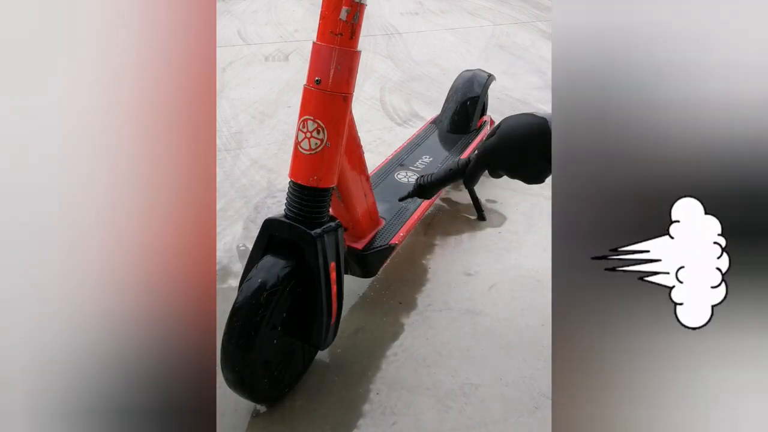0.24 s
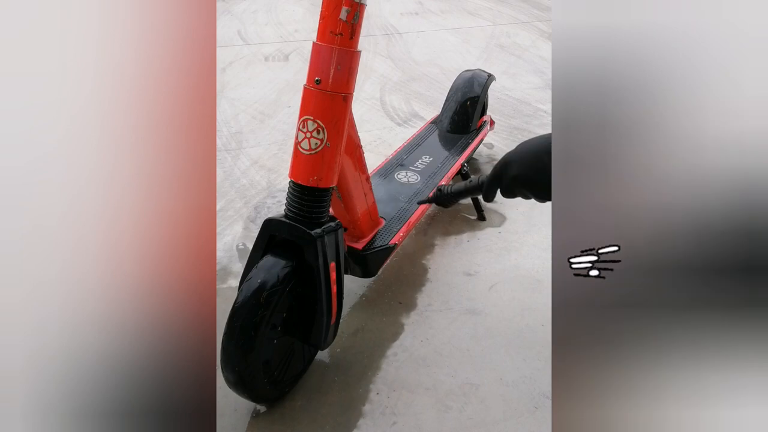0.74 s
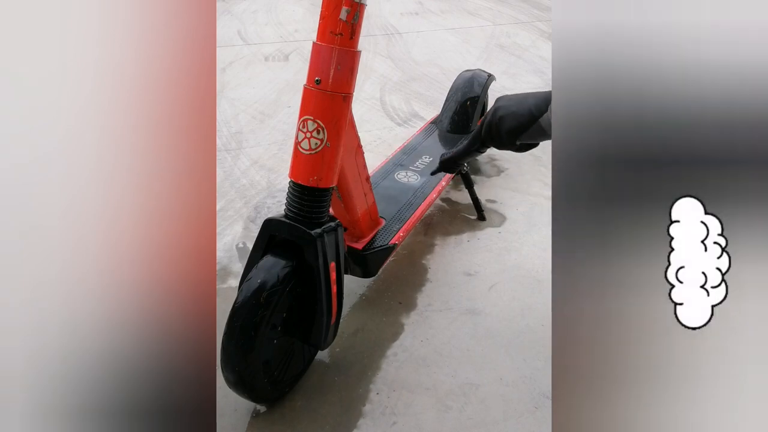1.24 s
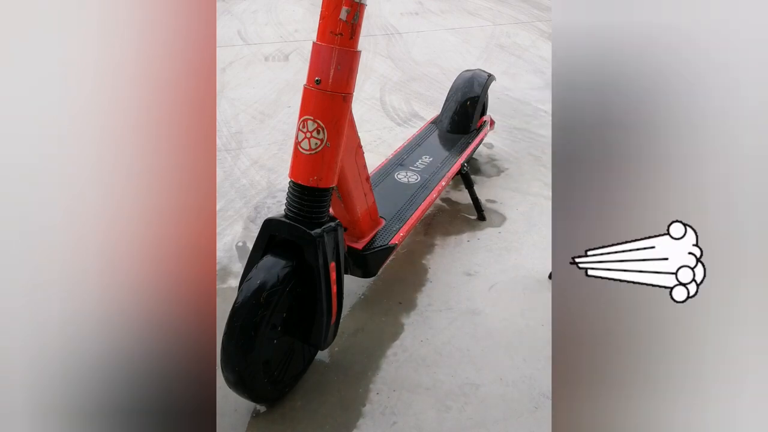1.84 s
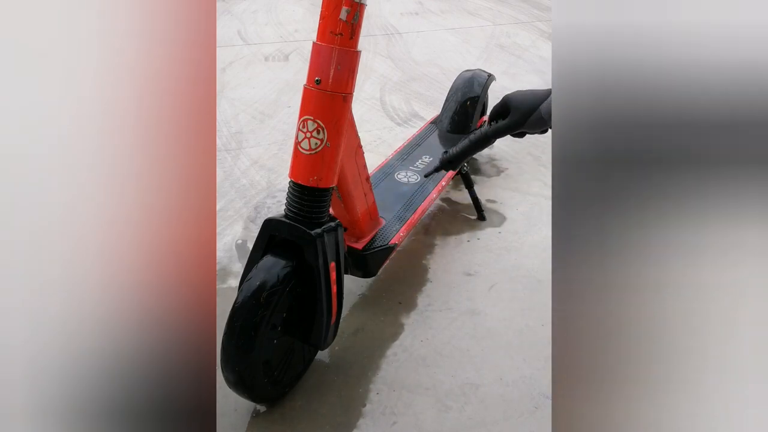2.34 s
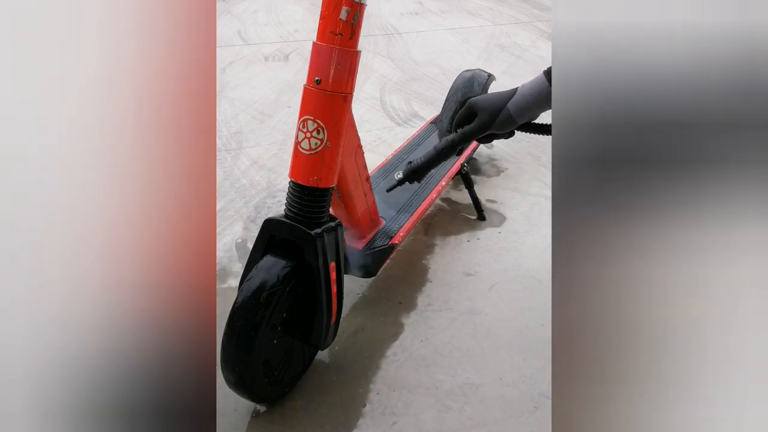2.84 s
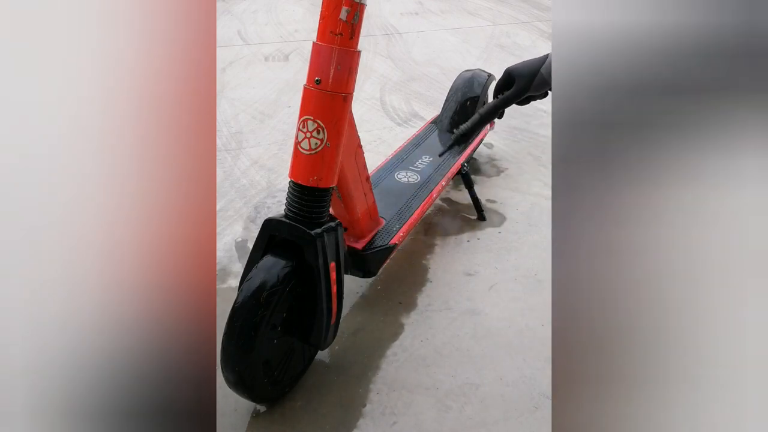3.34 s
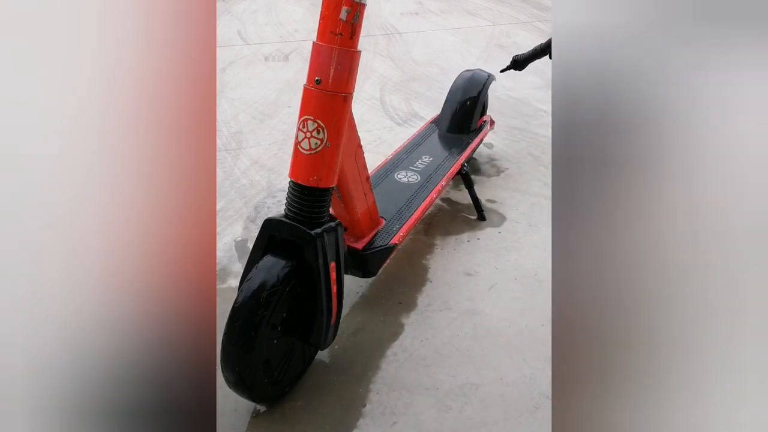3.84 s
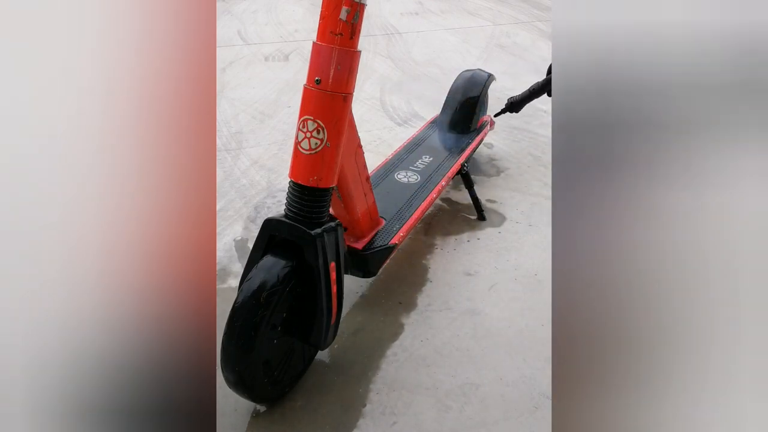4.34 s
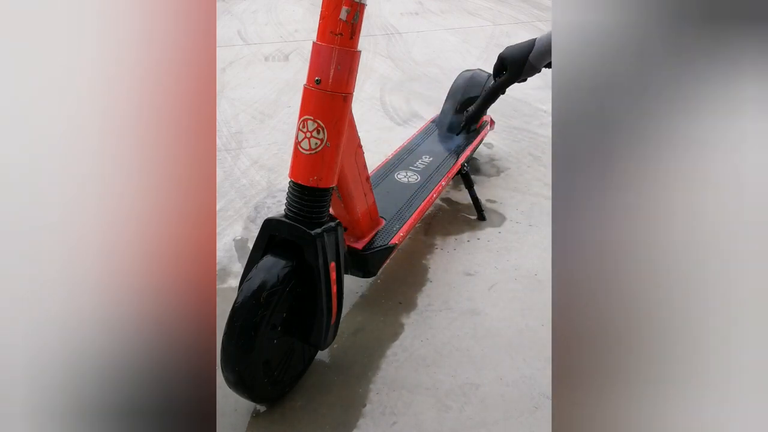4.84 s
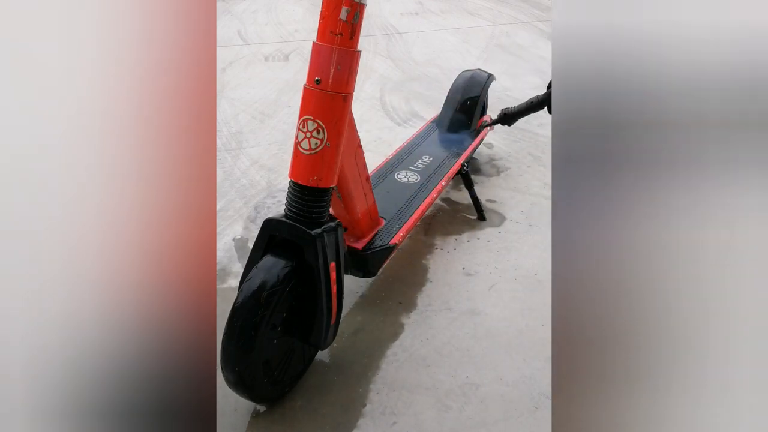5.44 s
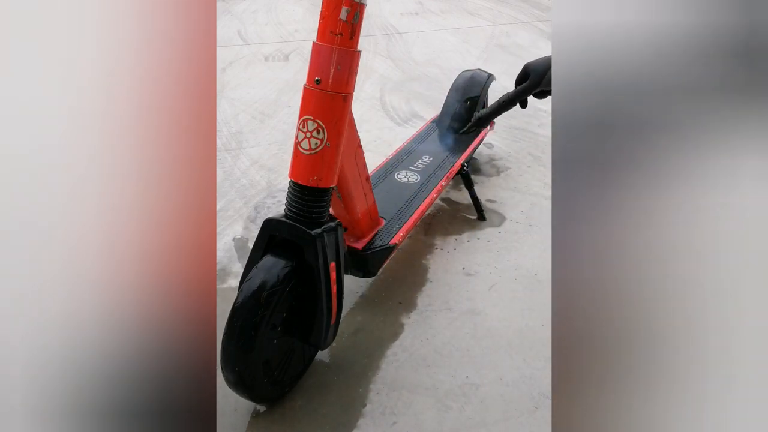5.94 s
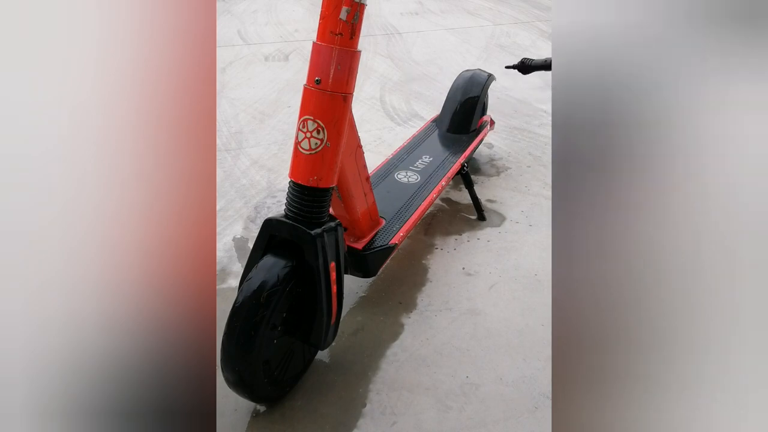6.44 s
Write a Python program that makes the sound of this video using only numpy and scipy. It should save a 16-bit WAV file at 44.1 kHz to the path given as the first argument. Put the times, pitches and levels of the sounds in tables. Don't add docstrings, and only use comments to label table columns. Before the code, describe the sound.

A steam cleaner wand hisses close by on a scooter over a concrete floor. After about a second and a half the trigger is released: low thumps, a tiny squeak and a hard valve click in near silence. The jet bursts back, flutters over ribs, then sputters, gurgles and toots around the rear wheel. Close stereo microphone, mostly dry, spray leaning left.

```python
import sys
import numpy as np
from scipy import signal
from scipy.fft import rfft, irfft, next_fast_len
from scipy.io import wavfile

SR = 44100
rng = np.random.default_rng(int(sys.argv[2]) if len(sys.argv) > 2 else 0)


def attenuation_scalar(level_db):
    decades = np.asarray(level_db, float) / 20
    return 10 ** decades


def output_pcm(signal):
    pcm = np.clip(np.atleast_2d(signal).T, -1, 1) * 32767
    wavfile.write(sys.argv[1], SR, np.round(pcm).astype(np.int16))


N = 295911
STEP = 40
HISS_HUMP = 7500, 0.72
SPLASH_HZ, SPIT_OCTAVES = 4000, 0.3


def at_hz(points, hz):
    table_hz, values = np.transpose(points)
    return np.interp(np.log(hz), np.log(table_hz), values)


def at_steps(rows):
    s, *columns = np.transpose(rows)
    steps_s = np.arange(N // STEP + 2) * STEP / SR
    return np.array([np.interp(steps_s, s, c) for c in columns])


def smooth(steps):
    return np.interp(np.arange(N) / STEP, np.arange(len(steps)), steps)


def drift(rate_hz):
    r = np.exp(-2 * np.pi * STEP * rate_hz / SR)
    slow = signal.lfilter([1], [1, -2 * r, r * r], rng.standard_normal(N // STEP + 2002))[2000:]
    return slow / slow.std()


def bell(bands_hz, centre_hz, octaves):
    return np.exp(-.5 * (np.log2(bands_hz / centre_hz) / octaves) ** 2)


def plateau(s, start_s, end_s):
    edge_s = 0.26 * (end_s - start_s)
    return np.clip(np.minimum(s - start_s, end_s - s) / edge_s, 0, 1) ** 2


def strike(force, modes, turn=1):
    out = 0
    for k, (hz, level_db, t60_s) in enumerate(modes):
        r, w = attenuation_scalar(-60 / (t60_s * SR)), 2 * np.pi * hz / SR
        gain = turn ** k * attenuation_scalar(level_db) * np.sin(w)
        out = out + signal.lfilter([0, gain], [1, -2 * r * np.cos(w), r * r], force + 1e-18)
    return out


def clicks_at(events):
    out = np.zeros(N)
    for s, level_db in events:
        out[round(s * SR)] = -attenuation_scalar(level_db)
    return out


def room_air(s):
    floor_db = [-68, -64.5, -63.5, -65, -85, -99]
    start_db, fade_db_per_s = np.array([-55.5, -53]), 33
    power = np.outer(attenuation_scalar(2 * np.array(floor_db)), np.ones(len(s)))
    power[:2] += attenuation_scalar(2 * (start_db[:, None] - fade_db_per_s * s))
    return power


def thumps():
    # start [s], level [dB], contact [ms]
    knocks = [(1.707, -26.5, 11.7), (1.73, -35, 20), (1.751, -29.5, 12.2), (1.934, -45, 15.5),
              (1.972, -55, 17), (2.013, -52, 14), (2.456, -52, 21), (2.485, -44.5, 16)]
    # mode [Hz], level [dB], t60 [s]
    thump_modes = [(55.5, 0, 0.076), (35.1, -7, 0.4), (78, -10, 0.2), (134, -6, 0.12), (210, -14, 0.05),
                   (310, -28, .04)]
    push = np.zeros(N)
    for s, level_db, contact_ms in knocks:
        start, count = round(s * SR), int(contact_ms * SR / 1000)
        press_release = np.sin(2 * np.pi * np.arange(count) / count) * np.pi / count
        push[start:start + count] -= attenuation_scalar(level_db) * press_release
    return strike(push, thump_modes)


def leak():
    # time [s], level [dB], pitch [Hz]
    squeak = [(1.748, -71, 4100), (1.757, -47, 4000), (1.766, -48, 3880), (1.774, -53, 3600),
              (1.79, -52, 3450), (1.796, -75, 3400)]
    level_db, hz = at_steps(squeak)
    level = smooth(attenuation_scalar(level_db + 4.0 * drift(120)) * (level_db > -69))
    wavering_hz = smooth(hz * (1 + .03 * drift(200)))
    return level * np.sin(2 * np.pi * np.cumsum(wavering_hz) / SR)


def trigger():
    # time [s], level [dB]
    valve = [
        (1.7952, -35),
        (1.7966, -22.5),
        (1.7982, -26.5),
        (1.803, -42),
    ]
    # valve mode [Hz], level [dB], t60 [s]
    valve_modes = [(556, -10.5, 0.019), (825, -21, 0.039), (1250, -9, 0.013), (1690, -18, 0.05),
                   (2200, -24, .018), (2680, 1.5, 0.013), (3560, -3, 0.0081), (4180, -1.5, 0.011),
                   (5150, -13, 0.02), (6700, -20, 0.008), (9500, -22, .005)]
    # time [s], level [dB]
    knock = [
        (1.848, -36),
    ]
    # lever mode [Hz], level [dB], t60 [s]
    knock_modes = [(840, 2, 0.038), (1770, -2.5, 0.015), (3500, -5, 0.01), (7440, -7, 0.006)]
    # time [s], level [dB]
    slap = [
        (1.748, -31),
        (1.759, -39.5),
    ]
    # hose mode [Hz], level [dB], t60 [s]
    slap_modes = [(216, -3, 0.069), (1020, -29, .04)]
    blows = [(valve, valve_modes), (knock, knock_modes), (slap, slap_modes)]
    ringing = sum(strike(clicks_at(events), modes, -1.012) for events, modes in blows)
    return signal.lfilter(*signal.butter(2, 9000, fs=SR), ringing)


def ticks():
    # start [s], level [dB], t60 [ms]
    cracks = [(1.7505, -52, 30), (1.7958, -34, 8), (1.798, -36, 10), (1.8485, -50, 25), (1.7165, -58, 20)]
    out, t = np.zeros(N), np.arange(SR // 10) / SR
    for s, level_db, t60_ms in cracks:
        start = round(s * SR)
        out[start:start + len(t)] += attenuation_scalar(level_db - 60000 * t / t60_ms) * rng.standard_normal(len(t))
    band = signal.butter(2, [1800, 8000], "band", fs=SR, output="sos")
    return signal.sosfilt(band, out + 1e-18)


def toots():
    # centre [s], length [ms], level [dB], pitch [Hz], glide [share of pitch]
    notes_blown = [(1.53, 45, -53, 858, 0.017), (1.92, 14, -33, 7600, -0.047), (2.185, 18, -48, 630, 0),
                   (2.299, 10, -45, 1300, 0.39), (3.47, 64, -63, 750, 0), (3.515, 35, -52, 780, 0.036),
                   (3.548, 23.5, -47, 756, -0.029), (3.573, 30, -44, 771, 0.032), (3.672, 41, -49, 770, 0),
                   (4.012, 14, -49, 750, 0.048), (4.033, 11, -40, 3290, 0), (4.205, 20, -40, 1760, -0.023),
                   (4.215, 20, -41.5, 800, -0.034), (4.245, 22, -41, 781, 0.034),
                   (4.327, 19, -38.5, 853, 0.031), (4.362, 16, -43, 905, 0), (4.41, 30, -43, 1750, 0),
                   (4.435, 16, -50, 820, 0), (4.57, 18, -41.5, 960, -0.022), (4.9624, 4, -29, 3300, 0),
                   (4.9665, 5, -30, 3400, 0), (4.955, 20, -47, 1100, 0), (5.042, 24, -48, 778, -0.013),
                   (5.062, 14, -34, 3300, 0), (5.642, 22, -31, 3950, -0.041), (5.683, 16, -30, 3900, .3),
                   (5.695, 14, -34.5, 3150, .1), (5.687, 20, -40, 9300, 0), (6.465, 23, -43, 794, -0.013),
                   (6.471, 8.5, -33.5, 1550, 0), (6.482, 20.5, -41, 1600, 0.08), (6.545, 23, -44, 3200, 0),
                   (6.548, 18, -42.5, 1550, 0.014)]
    out = np.zeros((2, N))
    waver, flicker = smooth(.04 * drift(164)), smooth(attenuation_scalar(3.0 * drift(120)))
    for s, length_ms, level_db, hz, glide in notes_blown:
        count = int(1.5 * length_ms * SR / 1000)
        start = round(s * SR) - count // 2
        span = slice(start, start + count)
        gliding_hz = hz * (1 + glide * np.linspace(-.5, .5, count) + waver[span])
        phase = 2 * np.pi * np.cumsum(gliding_hz) / SR
        turn = rng.uniform(-1.5, 1.5, (2, 1))
        level = attenuation_scalar(level_db + 2) * np.minimum(1.6 * np.hanning(count), 1) * flicker[span]
        out[:, span] += level * np.sin(phase + turn / 2)
    return out


def ribs():
    # first [s], last [s], ribs [count], level [dB], change along the run [dB]
    runs = [(2.344, 2.42, 3, -41, 3), (2.462, 2.643, 5, -34.5, -4.5), (2.833, 2.92, 3, -45, 0),
            (3.269, 3.41, 4, -39.5, 1.5)]
    out = []
    for first_s, last_s, count, level_db, change_db in runs:
        for k in np.linspace(0, 1, round(count)):
            s, db = first_s + (last_s - first_s) * k, level_db + change_db * k
            out.append((s, 30, [(db, SPLASH_HZ, 0.49), (db - 7.5, *HISS_HUMP)]))
    return out


def flares():
    # time [s], length [ms], level [dB]
    slips = [(.064, 6.6, -49), (.49, 3.8, -43), (.512, 20, -43), (.532, 18, -38), (.578, 24, -44),
             (.18, 33, -43), (.725, 50, -35.5), (0.787, 21, -35.5), (1.602, 30, -38), (1.716, 10, -58),
             (1.762, 24, -57.5), (2.23, 30, -39.5), (2.302, 18, -42), (6.15, 24, -38), (6.475, 20, -47),
             (1.854, 17, -56), (1.92, 8.7, -34), (1.974, 63, -36), (2.064, 7.8, -53), (2.139, 32, -43),
             (2.27, 22, -37.5), (2.718, 39, -44), (2.877, 20, -37), (2.999, 15, -39), (3.573, 31, -43),
             (3.623, 24, -43), (3.672, 73, -40), (3.76, 29, -42), (3.968, 18, -38), (3.998, 15, -41.5),
             (4.033, 20, -42.5), (4.312, 39, -38), (4.434, 21, -37.5), (4.618, 64, -31.5), (4.663, 13, -39),
             (5.404, 34, -41), (5.43, 11, -42), (5.81, 76, -41), (6.589, 30, -38.5)]
    return [(s, ms, [(db, *HISS_HUMP), (db - 12.5, SPLASH_HZ, SPIT_OCTAVES)]) for s, ms, db in slips]


def spits():
    # time [s], length [ms], level [dB], pitch [Hz]
    hits = [(.322, 17, -43, 4000), (.49, 8, -46, 3400), (.766, 19, -44.5, 1920), (1.036, 49, -46, 2850),
            (1.108, 39, -43.5, 3520), (1.233, 27, -42.5, 2390), (1.529, 17, -48, 2800),
            (1.858, 19, -56, 3420), (2.878, 29, -40, 3240), (2.999, 15, -50, 3260), (3.672, 72, -55, 3400),
            (3.884, 14, -45, 1900), (4.034, 11, -50, 3250), (4.618, 22, -41, 3400), (6.471, 7, -46, 3000),
            (6.48, 21, -43, 2900), (4.974, 8, -33, 6000), (5.062, 19, -31.5, 3280), (5.094, 28, -36, 3100),
            (5.14, 36, -46, 2980), (4.23, 32, -39, 3000), (5.605, 45, -42.5, 3000), (6.3, 81, -48.5, 2980),
            (4.312, 24, -42, 3540), (4.435, 17, -36, 3000), (4.567, 57, -33.5, 3060),
            (4.968, 14, -35, 3274), (5.072, 20, -36, 4200), (5.125, 65, -54, 2140), (5.521, 19, -42, 2420),
            (5.568, 19, -36, 2900), (5.643, 22, -34, 3600), (5.687, 26, -31.5, 3750),
            (1.776, 38, -56, 3300), (6.24, 16, -37, 3020), (1.41, 31, -48.5, 3660), (6.162, 36, -37, 2780),
            (6.549, 44, -40, 3640)]
    return [(s, ms, [(db, hz, SPIT_OCTAVES), (db - 6, *HISS_HUMP)]) for s, ms, db, hz in hits]


def gurgles():
    # time [s], length [ms], level
    # [dB], pitch [Hz]
    broad_puffs = [(.6, 110, -52.5, 450), (.57, 38, -50.5, 840), (.67, 86, -51, 650), (.085, 68, -51, 480),
                   (.07, 19, -49.5, 1200), (.3, 110, -57, 1590), (4.076, 13, -44, 1650),
                   (4.11, 70, -47.5, 1780), (4.06, 16, -49, 500), (4.175, 16, -48.5, 1290),
                   (4.48, 68, -41.5, 1000), (4.53, 22, -41, 790), (5.05, 38, -58, 780), (5.432, 11, -48, 780),
                   (5.52, 22, -44, 1000), (6.21, 30, -46, 1150), (6.465, 17, -48, 800), (6.645, 85, -63, 1190),
                   (1.53, 38, -54.5, 820), (2.107, 17, -49, 663), (2.184, 17, -47.5, 676),
                   (2.302, 15, -41.5, 1250), (2.3, 19, -46, 750), (2.999, 18, -42, 1540),
                   (3.227, 11, -43.5, 1820), (3.265, 75, -54.5, 190), (3.48, 40, -64, 745),
                   (3.577, 39, -43, 800), (3.673, 25, -45.5, 760), (4.016, 12, -42.5, 700),
                   (4.2, 30, -50, 1720), (4.235, 40, -41, 810), (4.3, 23, -43, 824), (4.361, 16, -37.5, 885),
                   (4.434, 16, -38.5, 795), (4.41, 28, -37, 1650), (4.665, 17, -42, 780),
                   (4.691, 25, -41.5, 780), (4.802, 17, -50, 305), (4.848, 23, -44.5, 500),
                   (5.278, 8.7, -42, 338), (5.291, 24, -42.5, 382), (5.405, 12, -39, 1150),
                   (4.57, 44, -42, 970), (6.167, 51, -44, 790), (6.251, 35, -44, 1180), (6.32, 44, -51, 1450),
                   (6.476, 20, -38, 1530), (6.55, 64, -46, 1510),
                   (1.78, 32, -52, 800), (5.285, 43, -45.5, 650), (5.28, 47, -45, 250), (4.678, 45, -49, 800),
             (4.735, 27, -51, 590), (4.11, 89, -61.5, 130), (3.3, 90, -60.5, 100), (5.7, 76, -58.5, 260),
             (4.75, 260, -47, 9400), (5.8, 220, -43, 8800), (4.2, 170, -54, 9300), (5.685, 20, -37, 4500),
             (5.643, 25, -38, 4300), (2.0, 70, -41, 11000), (0.89, 30, -54, 7600), (1.23, 27, -46.5, 1240),
             (0.76, 27, -53, 940), (5.567, 21, -39.5, 1200), (4.2, 38, -41, 990), (6.4, 22, -44.5, 1200),
             (5.93, 33, -55, 550), (3.8, 56, -50, 650), (0.51, 54, -41, 4300), (1.93, 22, -38, 9000),
             (1.811, 20, -46, 1900), (1.88, 55, -69, 6400), (1.4, 62, -70, 470), (3.0, 140, -58, 167),
             (3.75, 220, -60, 330), (4.06, 130, -58, 290), (4.95, 190, -59, 205), (6.0, 240, -62.5, 265),
             (6.45, 120, -55, 270), (6.66, 65, -57, 260)]
    return [(s, ms, [(db, hz, 0.39)]) for s, ms, db, hz in broad_puffs]


def trigger_gate_db():
    let_go_s, press_s, drain_db = 1.62, 1.9045, -46
    shut_s = let_go_s + 0.074
    gate_db, = at_steps([(let_go_s, 0), (shut_s, -14.5), (shut_s + 0.067, drain_db),
                         (press_s, drain_db), (press_s + 0.0037, -17), (press_s + 0.0058, 0)])
    return gate_db


def bed():
    # time [s], jet hiss [dB], aim (+ airy, - onto the surface) [dB],
    # left-right [dB]
    wand = [(0.0, -39, -0.5, 2), (0.2, -44, -4.5, 5), (0.77, -45, -3.5, 2), (0.86, -48.5, -6.5, 4.3),
            (1.48, -48, -2.5, 4.3), (1.55, -42.5, 2.5, 1), (1.96, -39, 2.5, 1.5), (2.07, -41, 1.5, 4),
            (3.5, -42, -1.5, 5), (3.6, -37.5, 0, 4.5), (3.72, -46, -3.5, 6.7), (3.86, -47, -2, 6.4),
            (4.3, -46, -9, 3.7), (4.64, -41.5, 3, 4.3), (4.82, -43.5, -3.5, 5), (5.3, -43, -1, 4.5),
            (6.3, -46, -2, 3.9), (6.71, -49, -4.5, 5)]
    # level at mean jet [dB], share of its swing, share of the aim
    follow = [(-59.5, 1.67, -2.5), (-47.5, 0.81, -0.49), (-42, 1.38, -0.26), (-48.5, 1.27, 0.5)]
    # start [s], end [s], roar [dB], splash [dB]
    dwells = [(0, 0.707, -58.5, -74), (.68, .82, -74, -51), (0.904, 1.004, -53.5, -46),
              (0.98, 1.13, -56, -47), (1.167, 1.374, -55, -49), (1.5, 1.6, -59, -68),
              (2.068, 2.433, -54, -49.5), (2.707, 3.1, -60, -53), (3.637, 3.736, -53.5, -51),
              (3.84, 3.934, -59, -51), (3.978, 4.217, -47.5, -50.5), (4.118, 4.65, -46, -39.5),
              (4.674, 4.913, -56, -78), (5.01, 5.176, -43, -38), (5.308, 5.494, -46, -64),
              (5.49, 5.695, -48, -44.5), (5.586, 5.816, -59, -46), (6.125, 6.326, -41.5, -44),
              (6.203, 6.44, -43.5, -64), (6.414, 6.559, -48.5, -52)]
    # start [s], end [s], hiss [dB]
    airy = [(0.523, 0.71, -46.5), (4.192, 4.3, -47.5), (4.365, 4.404, -38.5), (4.512, 4.582, -38),
            (4.865, 4.992, -39), (5.26, 5.312, -44), (5.704, 5.797, -52), (5.886, 5.944, -56),
            (5.99, 6.172, -45.5)]
    # start [s], end [s], change [dB]
    brief_changes = [(0.797, 0.93, -4), (1.153, 1.224, -4), (1.432, 1.507, -3), (0.566, 0.723, 1.5),
                     (3.606, 3.66, -4.5), (3.76, 3.844, -4), (4.142, 4.205, -2), (4.265, 4.289, -3.5),
                     (4.878, 4.92, -6), (5.17, 5.29, -5.5)]
    jet_mean_db = -42
    jet_db, aim_db, pan_db = at_steps(wand)
    s = np.arange(len(jet_db)) * STEP / SR
    gate_db = trigger_gate_db()
    power = room_air(s)
    for layer, (db, swing, aim) in enumerate(follow, 2):
        power[layer] += attenuation_scalar(2 * (db + swing * (jet_db - jet_mean_db) + aim * aim_db + gate_db))
    for start_s, end_s, roar_db, splash_db in dwells:
        levels_db = np.array([roar_db - 14.5, roar_db, splash_db])
        power[1:4] += np.outer(attenuation_scalar(2 * levels_db), plateau(s, start_s, end_s))
    for start_s, end_s, db in airy:
        levels_db = np.array([db, db - 11])
        power[4:] += np.outer(attenuation_scalar(2 * levels_db), plateau(s, start_s, end_s))
    for start_s, end_s, db in brief_changes:
        power[2:4] *= attenuation_scalar(2 * db * plateau(s, start_s, end_s))
    return power, pan_db


def turbulence(spectrum, left_lag, whistles, hz):
    # frequency [Hz], change [dB]
    top = [(9700, -4.5), (10300, -7), (11300, -12.5), (13000, -13.5), (15300, -15)]
    # frequency [Hz], left-right likeness [0-1]
    likeness = [(60, .72), (300, .82), (700, .8), (1400, .5), (3000, .47), (7000, .46), (11000, .4),
                (15000, .27)]
    # frequency [Hz], left-right [dB]
    ports = [(60, 0), (200, -7), (500, -6.5), (1170, -8), (1800, -1), (2750, -10.5), (4200, -4),
             (5600, -5.5), (7500, -5.5), (9200, 0), (11000, -4.5), (15000, -5)]
    last_db = spectrum[-1][1]
    colour_db = at_hz(spectrum + [(f, last_db + db) for f, db in top], hz)
    for peak_hz, width_hz, db in whistles:
        colour_db = colour_db + db / (1 + (2 * (hz - peak_hz) / width_hz) ** 2)
    mid, side = rfft(rng.standard_normal((2, 2 * len(hz) - 2)))
    alike = np.clip(at_hz(likeness, hz), 0, 1)
    both = np.sqrt(1 + alike) * mid + np.sqrt(1 - alike) * side * [[1], [-1]]
    both[0] *= np.exp(-1j * at_hz(left_lag, hz))
    return both * attenuation_scalar(colour_db) * attenuation_scalar(at_hz(ports, hz) * [[.5], [-.5]])


def steam():
    # frequency [Hz], density [dB per Hz]
    deck = [(20, 5), (60, -3.5), (130, -9.5), (400, -7), (800, -7), (1650, -5.5), (2200, -9), (2950, -3.5),
            (4950, -6.5), (5600, -0.5), (6400, -4.5), (7550, 1), (8300, -3.5), (9320, -1.5)]
    # frequency [Hz], density [dB per Hz]
    wheel = [(20, -13.5), (250, -14.5), (500, -11.5), (750, -2.5), (1150, -7), (1750, -3.5), (2400, -4.5),
             (3250, -2), (4800, -8.5), (5600, -6), (7000, -6.5), (7800, -4.5), (8500, -10.5), (9200, -5)]
    # frequency [Hz], lag of the left port [rad]
    deck_lag = [(100, 0), (900, .45), (1900, .9), (3500, 1.3), (5500, .2), (7000, .4), (9000, 1.6),
                (11000, 2.9)]
    # frequency [Hz], lag of the left port [rad]
    wheel_lag = [(100, 0), (900, .3), (1400, -.3), (2700, .75), (4500, .1), (6000, -.8), (7600, -2.2),
                 (10000, -1)]
    # whistle [Hz], width [Hz], level over the hiss [dB]
    whistles = [(353, 63, 2.5), (740, 31, 3.5), (1772, 51, 3.5), (2087, 26, 3.5), (3330, 28, 2),
                (3800, 33, -17), (4630, 41, 4.5)]
    # whistle [Hz], width [Hz], level over the hiss [dB]
    arch_whistle = [(9200, 520, 2.5)]
    layer_edges_hz = [0.1, 120, 450, 1500, 4800, 10500, 40000]
    reach_wheel_s, blend_octaves = 3.3, .2
    rise, fall = 0.27, 0.41

    size = 2 * next_fast_len(N // 2 + 1)
    hz = np.maximum(np.arange(size // 2 + 1) * SR / size, 1)
    bands_hz = 20 * 2 ** np.arange(0, 9.8, 1 / 3)
    windows = np.cos(np.clip(np.log2(hz / bands_hz[:, None]) * 3, -1, 1) * np.pi / 2) ** 2
    on_deck = turbulence(deck, deck_lag, whistles, hz)
    in_arch = turbulence(wheel, wheel_lag, whistles + arch_whistle, hz)
    wheel_share = at_steps([(reach_wheel_s, 0), (reach_wheel_s + .3, 1)])[0]
    deck_energy, arch_energy = [windows @ abs(c.mean(axis=0)) ** 2 * 2 / size ** 2 for c in (on_deck, in_arch)]
    energy = np.outer(deck_energy, 1 - wheel_share) + np.outer(arch_energy, wheel_share)

    bed_power, pan_db = bed()
    octaves_above = np.log2(bands_hz / np.array(layer_edges_hz)[:, None])
    above = .5 + .5 * np.tanh(octaves_above / blend_octaves)
    layers = above[:-1] - above[1:]
    power = layers.T @ (bed_power / (layers @ energy))
    for s, length_ms, humps in ribs() + flares() + spits() + gurgles():
        count = int(1.353 * length_ms * SR / STEP / 1000)
        start = round(s * SR / STEP) - int(0.45 * count)
        along = np.linspace(0, 1, count)
        ramp = np.clip(np.minimum(along / rise, (1 - along) / fall), 0, 1)
        shape = np.sin(ramp * np.pi / 2) ** 2
        lift = 0
        for level_db, centre_hz, octaves in humps:
            hump = bell(bands_hz, centre_hz, octaves)
            lift = lift + attenuation_scalar(2 * level_db) * hump / (hump @ energy[:, start])
        power[:, start:start + count] += np.outer(lift, shape)

    fade = smooth(wheel_share)
    mixed = np.sqrt(1 - fade) * irfft(on_deck)[:, :N] + np.sqrt(fade) * irfft(in_arch)[:, :N]
    noise = rfft(mixed, size)
    out, together, neighbour = 0, drift(44), drift(12)
    for window, band_power, band_hz in zip(windows, power, bands_hz):
        neighbour = np.sqrt(.5) * (neighbour + drift(3.5))
        flicker_db = .6 * together + 1.3 * neighbour + 1.0 * drift(24.0)
        flicker_db += 1.4 * bell(band_hz, 1170, 1.3) * drift(60)
        flicker_db += 2.8 * bell(band_hz, 45, 1.0) * neighbour
        band = irfft((noise * window).astype(np.complex64), size)[:, :N]
        out = out + band * smooth(attenuation_scalar(flicker_db) * np.sqrt(band_power))
    return out * attenuation_scalar(smooth(pan_db) * np.array([[.5], [-.5]]))


def scene():
    handle = leak() + trigger() + ticks()
    return thumps() * attenuation_scalar([[-2.2], [1.8]]) + handle * attenuation_scalar([[-3.0], [2.5]]) + toots() + steam()


def top_cut(x):
    return signal.sosfilt(signal.butter(12, 16380, fs=SR, output="sos"), x)


def record(dry):
    self_noise_db, splice_samples, ripple_db, cut_hz = -81.0, 1024, 1.05, 15120
    hissy = dry + attenuation_scalar(self_noise_db) * rng.standard_normal(dry.shape)
    spliced = hissy * attenuation_scalar(ripple_db * np.cos(2 * np.pi * np.arange(N) / splice_samples + .48))
    below_cut = np.arange(N // 2 + 1) * SR / N < cut_hz
    return top_cut(irfft(rfft(spliced) * below_cut, N))


dry = scene()
out = record(dry)
output_pcm(out)
```